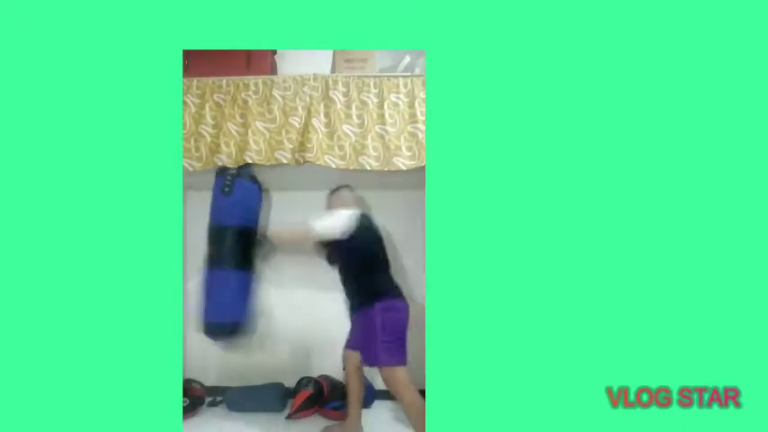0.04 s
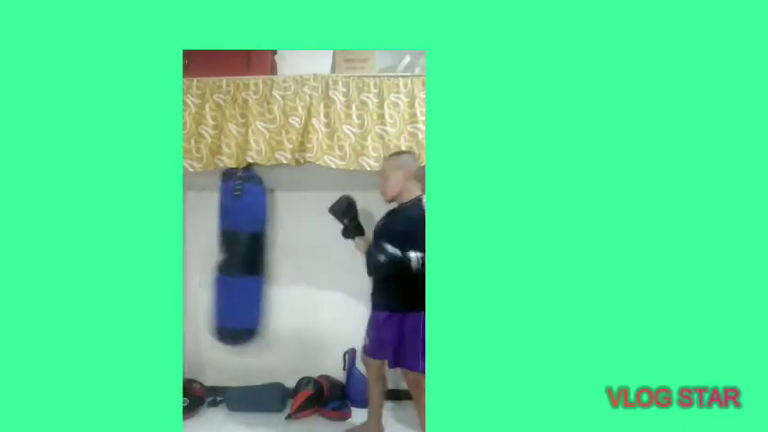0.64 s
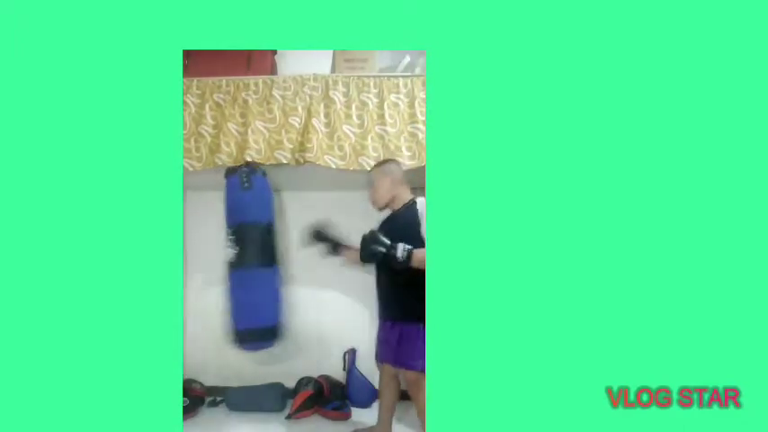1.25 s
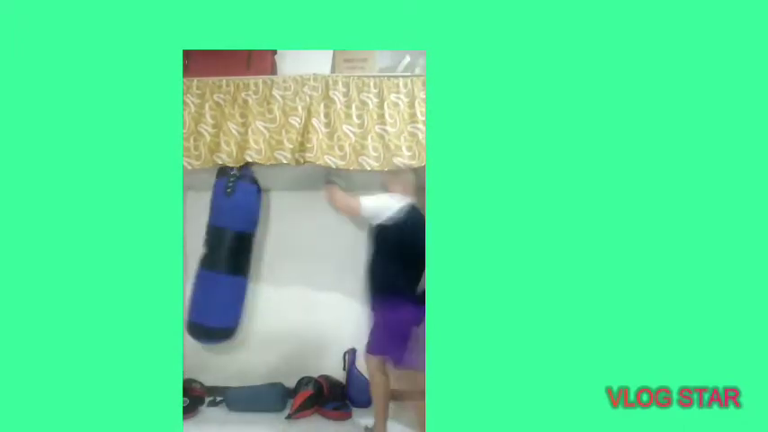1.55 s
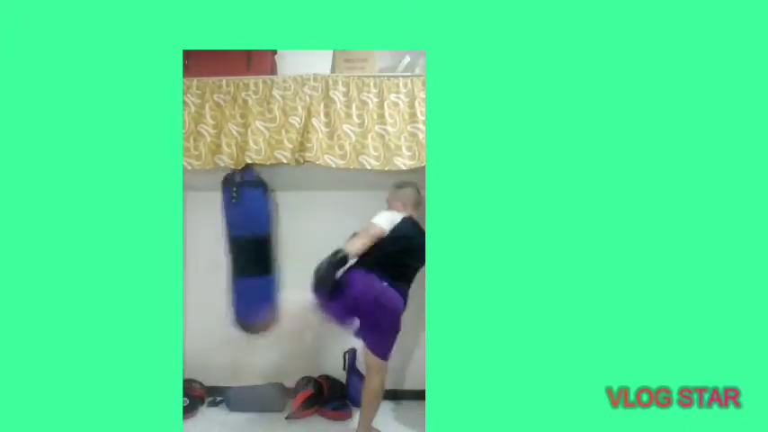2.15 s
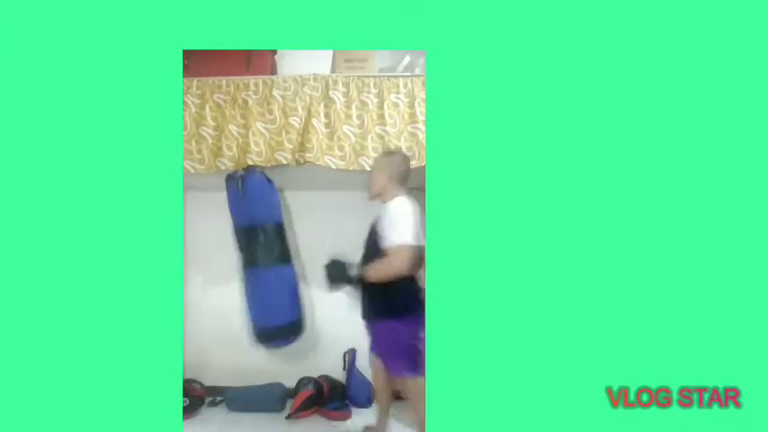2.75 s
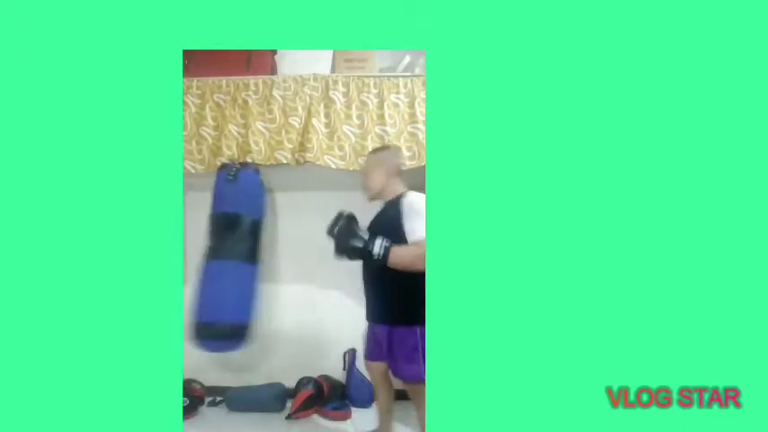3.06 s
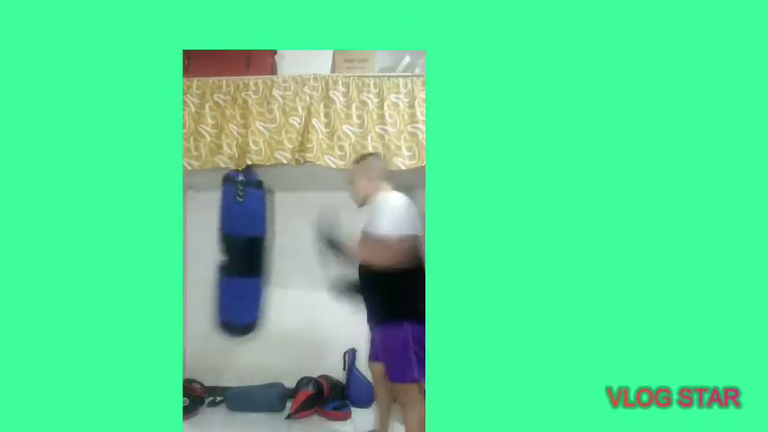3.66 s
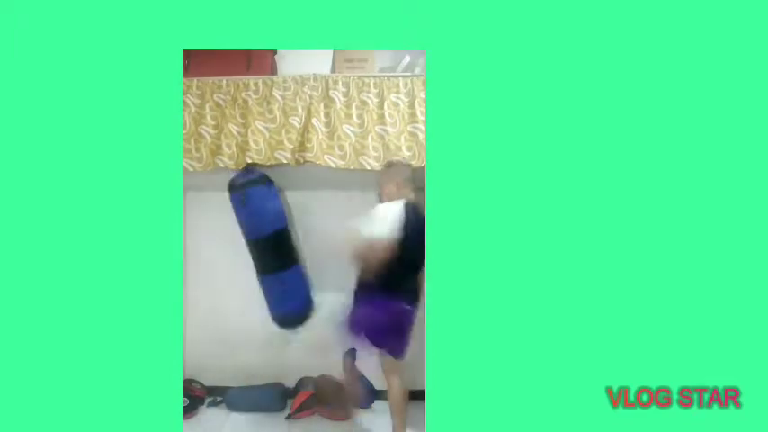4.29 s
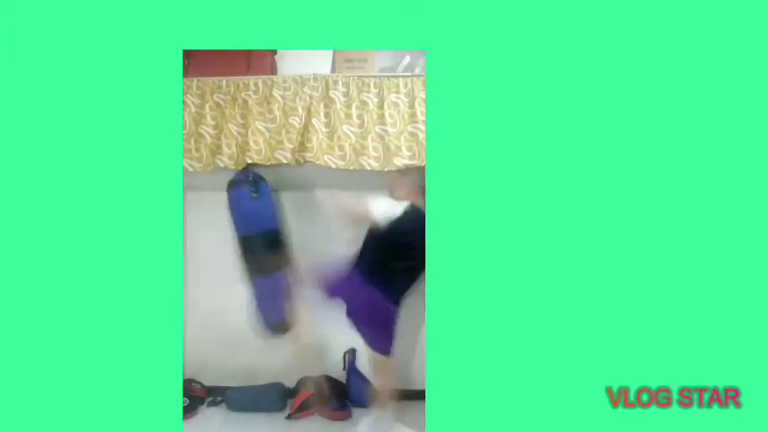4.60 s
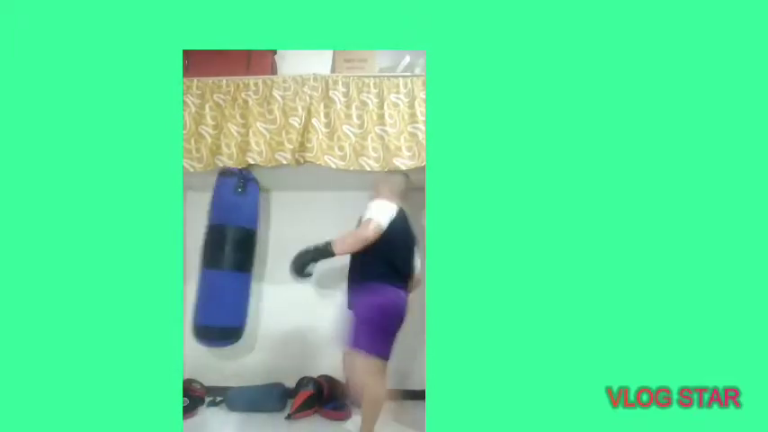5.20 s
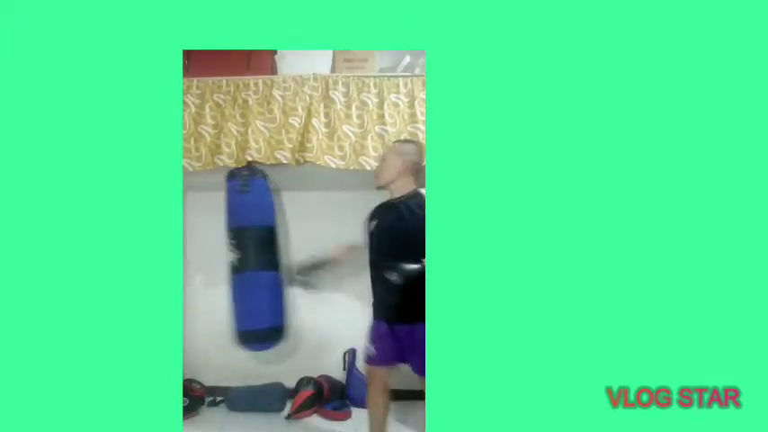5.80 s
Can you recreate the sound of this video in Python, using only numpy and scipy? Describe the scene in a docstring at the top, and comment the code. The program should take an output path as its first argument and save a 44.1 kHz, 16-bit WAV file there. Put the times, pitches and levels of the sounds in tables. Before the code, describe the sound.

A fan hums with a soft rush of air throughout, in a small, hard-walled room. Right at the start a light gloved punch slaps a vinyl heavy bag, which drops back with two soft thuds, a rustle and a short groan from its hanger. A faint jab lands at about 1 second. Feet scuff around 1.5 seconds, and at 1.9 a hard kick smacks the bag with a low room boom, followed by thuds, a light chain jingle and hanger creaks. Tiny squeaks and a quiet shuffle fill the gap until 4 seconds. Two more loud, sharp kicks land at about 4.1 and 4.7 seconds, with a brief squeak between them, each followed by the bag thudding and rustling back. The chain jingles again from 4.8 to 5.1 seconds. Near 5.9 seconds a last faint jab lands with a small scuff.

```python
"""A hanging heavy bag is worked in a small, hard-walled room while a fan hums throughout.
A light gloved cross and a jab come first: each blow slaps the vinyl cover and sets the low room modes
booming. The bag drops back with two thuds and a rustle; its hanger groans and the vinyl squeaks.
Feet scuff into a hard mid kick that jingles the chain. After a shuffle come a low kick and a high
kick, the chain jingles again, and a last faint jab lands."""
import sys
import numpy as np
from scipy import signal
from scipy.fft import rfft, irfft, next_fast_len
from scipy.io import wavfile
from scipy.ndimage import map_coordinates

SR = 44100
rng = np.random.default_rng(int(sys.argv[2]) if len(sys.argv) > 2 else 0)


def int16_out(signal):
    """Quantize to a 16-bit WAV file."""
    q = np.round(np.clip(np.atleast_2d(signal).T, -1, 1) * 32767)
    wavfile.write(sys.argv[1], SR, q.astype(np.int16))


N = 261954


def amp(db):
    return 10 ** (np.asarray(db) / 20)


def unit_rms(x):
    return x / np.sqrt(np.mean(x ** 2) + 1e-20)


def along(points, hz):
    """Interpolate (Hz, value) points on a log frequency axis."""
    point_hz, values = np.transpose(points)
    return np.interp(np.log(hz + 1), np.log(point_hz + 1), values)


def wobble(knots_per_s, size=N):
    """Smooth random curve of roughly unit spread."""
    knots = rng.standard_normal(size // 20 + 8)
    return map_coordinates(knots, [np.arange(size) * knots_per_s / SR], mode="mirror")


def arch(t, length_s, skew=1):
    """Half-sine envelope; a skew under 1 peaks early."""
    return np.abs(np.sin(np.pi * np.clip(t / length_s, 0, 1) ** skew))


def add(track, start_s, sound):
    """Mix a sound in, trimmed to the track."""
    start = round(start_s * SR)
    part = sound[max(-start, 0):N - start]
    track[max(start, 0):][:len(part)] += part


def coloured(x, gain_db):
    """Minimum-phase filter with the response gain_db(Hz)."""
    size = 2 * next_fast_len(len(x) // 2 + SR // 8)
    gain = np.maximum(amp(gain_db(np.fft.rfftfreq(size, 1 / SR))), 1e-6)
    cepstrum = irfft(np.log(gain), size)
    cepstrum[1:size // 2] *= 2
    cepstrum[size // 2 + 1:] = 0
    return irfft(rfft(x, size) * np.exp(rfft(cepstrum)), size)[:len(x)]


# Wall reverberation. Each row: frequency in Hz, T60 in seconds.
ROOM_DECAY = [(100, 0.62), (260, 0.37), (700, 0.24), (1840, 0.26), (4850, .29), (12800, 0.33)]


def room_tail():
    """Random room response of unit energy; each frequency dies at its own rate."""
    hz, t, spectrum = signal.stft(rng.standard_normal(SR // 2), SR, nperseg=256)
    decay = amp(-60 * t / along(ROOM_DECAY, hz)[:, None])
    _, tail = signal.istft(spectrum * decay, SR, nperseg=256)
    return tail / np.linalg.norm(tail)


def in_room(x, wet_db):
    """Direct sound plus wall reflections, at about unchanged power."""
    reflections = signal.fftconvolve(x, room_tail())[:N]
    return (x + amp(wet_db) * reflections) / np.hypot(1, amp(wet_db))


# Peaks and notches of cover and walls per stroke, and of the fan's air.
# Each row: centre in Hz, width in Hz, gain in dB.
RESONANCES = { "mid kick": [(700, 180, 10), (800, 100, -18), (922, 84, -1.5), (1090, 85, -10.5),
              (1210, 160, -3.5), (1486, 160, 5), (2990, 84, 5.5), (5360, 219, -8)],
              "low kick": [(907, 92, -15), (1083, 42, -4), (1600, 130, -9), (1940, 67, -12),
              (2520, 150, 2.5), (2840, 200, -11), (3830, 300, 4.5), (5440, 160, -6), (7400, 510, 8)],
              "high kick": [(626, 32, -9), (980, 84, -2.5), (1080, 82, -5), (1260, 26, -3), (1550, 68, -12),
              (2440, 81, 4.5), (3580, 203, -4.5), (3850, 270, 3)], "cross": [(495, 92, 12), (1120, 78, 9.5),
              (1910, 56, 6), (2140, 141, 6), (7160, 450, 6.5)], "jab": [(408, 32, -13), (1030, 81, 10.5),
              (1163, 35, -17)], "air": [(375, 58, -11.5), (628, 26, 9.5), (812, 54, -6), (1162, 53, 5.5),
              (2350, 430, 5), (3810, 520, 4.5)], }


def resonance_db(name, hz):
    """Summed gain of narrow peaks and notches."""
    return sum(db / (1 + (2 * (hz - centre_hz) / width_hz) ** 2)
               for centre_hz, width_hz, db in RESONANCES[name])


# Cover slap spectrum per stroke. Each row: frequency in Hz, relative density in dB.
SLAP_SPECTRA = { "mid kick": [(140, -12), (290, -14), (420, -5), (620, -10.5), (900, 3), (1400, -8),
                (2400, -2), (3200, -4.5), (5000, -7.5), (6200, -1.5), (7700, -6.5), (9000, -20.5),
                (12200, -32), (15200, -29)], "low kick": [(140, -15), (290, -8.5), (420, -13), (620, -7.5),
                (900, 0), (1400, -4.5), (2400, -0.5), (3200, -6.5), (5000, -14), (6200, -10.5), (7700, -18),
                (9000, -29.5), (12200, -44), (15200, -41)], "high kick": [(140, -15), (290, -9),
                (420, -4.5), (620, -7), (900, -10.5), (1400, -4.5), (2400, -5.5), (3200, -8), (5000, -15),
                (6200, -5.5), (7700, -8), (9000, -22.5), (12200, -33), (15200, -28)], "jab": [(140, -18),
                (290, 2.5), (420, -0.5), (620, -4.5), (900, -2.0), (1400, -4.5), (2400, 1), (3200, -5),
                (5000, -7), (6200, 0), (7700, -1), (9000, -14.5), (12200, -28), (15200, -23.5)],
                "cross": [(140, -22), (290, 2), (420, -4.5), (620, -12), (900, -4), (1400, -2.5),
                (2400, -3), (3200, -4.5), (5000, -8), (6200, -4), (7700, -8), (9000, -18), (12200, -32),
                (15200, -27)], }


def slap(stroke, build_up_s, crack=0.12, contact_s=0.000093, sparse_s=0.014):
    """One sharp pressure pulse, then separate wall echoes that thicken into the room's tail."""
    tail = room_tail()
    t = np.arange(len(tail)) / SR
    density = np.clip((t / sparse_s) ** 2, 0.15, 1)
    echoes = tail * (rng.random(len(t)) < density) / np.sqrt(density)
    echoes *= 1 - np.exp(-t / build_up_s)
    pulse = t / contact_s * np.exp(-t / contact_s)
    pressure = echoes - crack * pulse / np.linalg.norm(pulse)
    sound = coloured(pressure, lambda hz: along(SLAP_SPECTRA[stroke], hz) + resonance_db(stroke, hz))
    return sound / np.std(sound[:SR // 25])  # unit level over the first 40 ms


# Low room modes. Each row: frequency in Hz, relative level in dB, base T60 in seconds.
ROOM_MODES = [(59.47, -4.5, 0.72), (79.5, -16.5, 1), (107.9, 3, 0.29), (122.3, -8.5, 0.58),
              (156.6, -8, 0.45), (208.6, -12, 0.47), (279.7, -27, 0.36)]


def boom(tilt_db_oct, t60_scale=1, rise_s=0.0098, scatter_db=4.0):
    """The filling shoves the air and the low room modes swell; a softer spot favours the lowest."""
    modes, t = np.zeros(SR), np.arange(SR) / SR
    for k, (hz, db, t60_s) in enumerate(ROOM_MODES):
        start_db = db + tilt_db_oct * np.log2(hz / 100) + rng.normal(0, scatter_db)
        envelope = amp(start_db - 60 * t / (t60_s * t60_scale))
        modes -= (-1) ** k * envelope * np.sin(2 * np.pi * hz * t)  # neighbours swing in opposition
    return modes * (1 - np.exp(-t / rise_s))


# Punches and kicks. Each row: start in seconds, stroke, slap level in dB, boom gain in dB,
# boom tilt in dB per octave, boom T60 factor, echo build-up in seconds.
BLOWS = [ (-0.012, "cross", -29, -30, 10, 0.85, 0.0017), (0.959, "jab", -42, -37.5, 1.5, 0.7, 0.0033),
         (1.908, "mid kick", -15.5, -12, 0, 0.55, 0.00033),
         (4.1221, "low kick", -14.5, -21.5, -7, 1.19, 0.0012),
         (4.7017, "high kick", -14.5, -18, 3, 0.65, 0.0011), (5.857, "jab", -42, -47, 12.5, 0.56, 0.001), ]


def blows():
    """Each blow slaps the cover and sets the room booming."""
    out = np.zeros(N)
    for start_s, stroke, slap_db, boom_db, tilt_db_oct, t60_scale, build_up_s in BLOWS:
        add(out, start_s, amp(slap_db) * slap(stroke, build_up_s))
        add(out, start_s, amp(boom_db) * boom(tilt_db_oct, t60_scale))
    return out


# The fan's rushing air and low rumble. Each row: frequency in Hz, relative density in dB.
AIR_SPECTRUM = [(170, -0.5), (290, 1.5), (420, 1), (620, -5), (900, -4), (1400, -8.5), (2400, -9),
                (3200, -10.5), (5000, -18.5), (6200, -13), (7700, -16.5), (9000, -33), (12200, -41),
                (15200, -38.5)]
RUMBLE_SPECTRUM = [(15, -18), (48, -21), (70, -7), (140, -11), (250, -19.5), (900, -73)]
# Fan tones. Each row: frequency in Hz, level in dB, drift depth as a ratio.
HUM_TONES = [(65.4, -53, 0.34), (116.7, -61.5, 0.85), (79.6, -67, 1), (170, -70.5, 0.9)]


def fan(air_db=-52.5, rumble_db=-63, flutter_hz=15, flutter_db=0.7):
    """Wavering hum and rumble under rushing air that pulses gently with the blades."""
    hum, t = np.zeros(N), np.arange(N) / SR
    air = coloured(rng.standard_normal(N), lambda hz: along(AIR_SPECTRUM, hz) + resonance_db("air", hz))
    blade_phase = 2 * np.pi * flutter_hz * t + wobble(2.28)
    flutter = amp(flutter_db * np.sin(blade_phase) + 0.079 * wobble(4.9))
    rumble = coloured(rng.standard_normal(N), lambda hz: along(RUMBLE_SPECTRUM, hz))
    for hz, db, depth in HUM_TONES:
        drift = 1 + depth * (wobble(10) + 1j * wobble(9.4))  # amplitude and phase wander
        hum += amp(db) * unit_rms(np.real(drift * np.exp(2j * np.pi * hz * t)))
    return amp(air_db) * unit_rms(air) * flutter + amp(rumble_db) * unit_rms(rumble) + hum


# Cloth friction spectrum. Each row: frequency in Hz, relative density in dB.
CLOTH_SPECTRUM = [(150, -33), (290, -0.5), (620, -7.5), (1400, -6.5), (2400, -3.5), (5000, -10),
                  (7700, -6.5), (9000, -23.5), (12200, -34.5), (15200, -34)]


def rub(length_s, tilt_db_oct, grain_db=4):
    """One short stroke of grainy friction noise."""
    t = np.arange(SR // 4) / SR
    grains = rng.standard_normal(len(t)) * amp(grain_db * wobble(634, len(t)))
    noise = coloured(
        grains, lambda hz: along(CLOTH_SPECTRUM, hz) + tilt_db_oct * np.log2((hz + 200) / 3000))
    return arch(t, length_s, skew=0.67) * unit_rms(noise)


# Drops of the swung bag. Each row: start in seconds, rustle length in seconds, rustle level in dB,
# rustle tilt in dB per octave, thud gain in dB, thud tilt in dB per octave.
REBOUNDS = [(0.095, 0.13, -40, -1.5, -50, 5), (1.071, 0.074, -52, -1.5, -64, 5),
            (2.08, 0.12, -43.5, 1, -42, -10.5), (4.273, 0.028, -36.5, -1.5, -44, 5),
            (4.892, 0.11, -36, 0.9, -43.5, 3)]


def rebounds(settle_s=0.075, settle_gain_db=0.5):
    """The bag drops back on its hanger with a thud and a rustle, then thuds as the filling settles."""
    thuds, rustles = np.zeros(N), np.zeros(N)
    for start_s, _, _, _, db, tilt_db_oct in REBOUNDS:
        add(thuds, start_s, amp(db) * boom(tilt_db_oct, rise_s=0.0079))
        add(thuds, start_s + settle_s, amp(db + settle_gain_db) * boom(tilt_db_oct, rise_s=0.0057))
    for start_s, length_s, db, tilt_db_oct, _, _ in REBOUNDS:
        add(rustles, start_s, amp(db) * rub(length_s, tilt_db_oct))
    return thuds + in_room(rustles, wet_db=4)


# Hanger groans. Each row: start and length in seconds, first and last slip rate in Hz, level in dB.
GROANS = [(0.116, 0.17, 142, 104, -40.5), (2.092, .065, 110, 150, -39.5), (2.145, 0.0784, 250, 91, -35)]
# Harmonics of the slip rate, lowest first. Each entry: relative level in dB.
GROAN_HARMONICS_DB = [2, -8, -12, -16, -42]


def hanger_groans(jitter=0.056, rough_db=7.5, envelope_power=0.39):
    """The loaded hanger sticks and slips; the slip rate glides with the swing."""
    out, t = np.zeros(N), np.arange(SR // 4) / SR
    for start_s, length_s, first_hz, last_hz, db in GROANS:
        slip_hz = first_hz * (last_hz / first_hz) ** np.minimum(t / length_s, 1)
        slip_hz *= 1 + jitter * wobble(127, len(t))
        phase = 2 * np.pi * np.cumsum(slip_hz) / SR
        tone = sum(amp(harmonic_db + rough_db * wobble(63.7, len(t))) * np.sin(k * phase)
                   for k, harmonic_db in enumerate(GROAN_HARMONICS_DB, 1))
        add(out, start_s, amp(db) * unit_rms(tone) * arch(t, length_s) ** envelope_power)
    return in_room(out, wet_db=-9.5)


# Friction squeaks. Each row: start and length in seconds, centre in Hz, level in dB.
SQUEAKS = [(0.441, 0.031, 5970, -58), (2.303, 0.077, 2450, -53.5), (2.815, 0.045, 5860, -54.5),
           (4.411, 0.041, 3320, -49)]


def squeaks(width_ratio=0.2):
    """Vinyl and soles chafe; the friction catches in one narrow resonance."""
    out, t = np.zeros(N), np.arange(SR // 4) / SR
    for start_s, length_s, centre_hz, db in SQUEAKS:
        noise = rng.standard_normal(len(t))
        band = coloured(noise, lambda hz: -20 * np.log10(1 + ((hz / centre_hz - 1) / width_ratio) ** 2))
        add(out, start_s, amp(db) * arch(t, length_s) * unit_rms(band))
    return in_room(out, wet_db=-2)


# Foot pivots and brushing clothes. Each row: start and length in seconds, level in dB.
SCUFFS = [(1.536, 0.063, -45), (1.611, 0.06, -42), (3.066, .07, -53.5), (4.63, .12, -54),
          (4.827, 0.055, -43), (5.912, .034, -46)]


def scuffs(tilt_db_oct=0.7, shuffles=3, shuffle_from_s=3.6, shuffle_span_s=0.45, shuffle_db=-54):
    """Feet and clothes rub as the boxer winds up, recovers, or shuffles back into stance."""
    out = np.zeros(N)
    for start_s, length_s, db in SCUFFS:
        add(out, start_s, amp(db) * rub(length_s, tilt_db_oct))
    for k, (offset, stretch) in enumerate(rng.random((shuffles, 2))):
        start_s = shuffle_from_s + shuffle_span_s * (k + offset) / shuffles
        length_s = 0.038 * (0.5 + stretch)
        add(out, start_s, amp(shuffle_db) * rub(length_s, tilt_db_oct))
    return in_room(out, wet_db=4)


# Steel link modes. Each row: frequency in Hz, relative level in dB, T60 in seconds.
LINK_MODES = [(2450, -6, .15), (6051, -4, .2), (7079, -3, .2), (7311, -3, .2), (10379, -1, .24),
              (11111, -6, .16), (15030, 0, .15)]
# Runs of clinks. Each row: start and length in seconds, first clink's gain in dB.
JINGLES = [(2.004, .15, -56.5), (4.788, .16, -47.5), (5.089, .03, -62)]


def chain(gap_s=0.06, rise_db_per_clink=0.5, scatter_db=1.6, detune=0.0019, tick_t60_s=0.11):
    """Links ring and chatter against each other after a hard kick and as the chain falls slack."""
    out, t = np.zeros(N), np.arange(SR // 2) / SR
    for start_s, length_s, db in JINGLES:
        for k, delay_s in enumerate(np.arange(0, length_s, gap_s)):
            ring = np.zeros(len(t))
            for hz, mode_db, t60_s in LINK_MODES:
                envelope = amp(mode_db + rng.normal(0, scatter_db) - 60 * t / t60_s)
                ring += envelope * np.sin(2 * np.pi * hz * rng.normal(1, detune) * t)
            chatter = 1 + wobble(200, len(t))
            tick = amp(-60 * t / tick_t60_s) * rng.standard_normal(len(t))
            add(out, start_s + delay_s, amp(db + k * rise_db_per_clink) * (ring * chatter + tick))
    return in_room(out, wet_db=-9)


def scene():
    """Mono mix of bag and boxer over the fan."""
    return (blows() + rebounds() + hanger_groans() + squeaks() + scuffs() + chain() + fan())[None]


def record(dry, cutoff_hz=15560):
    """The microphone rounds off the hardest peaks and cuts the treble above its band limit."""
    rounded = dry / (1 + dry ** 4) ** (1 / 4)
    lowpass = signal.ellip(10, 0.2, 70, cutoff_hz, fs=SR, output="sos")
    return signal.sosfilt(lowpass, rounded)


dry = scene()
out = record(dry)
int16_out(out)
```